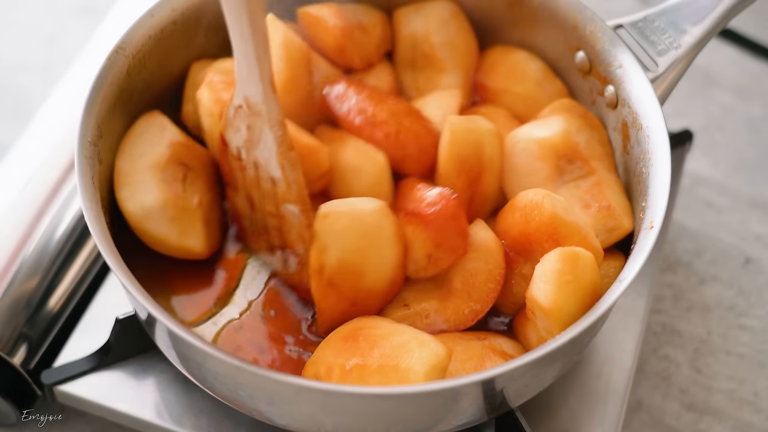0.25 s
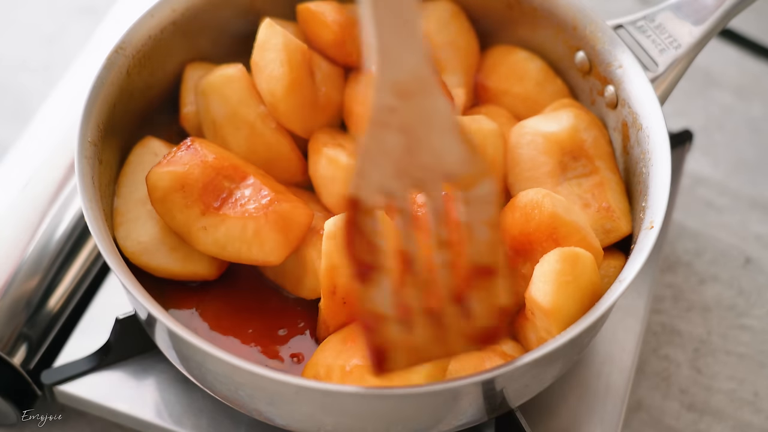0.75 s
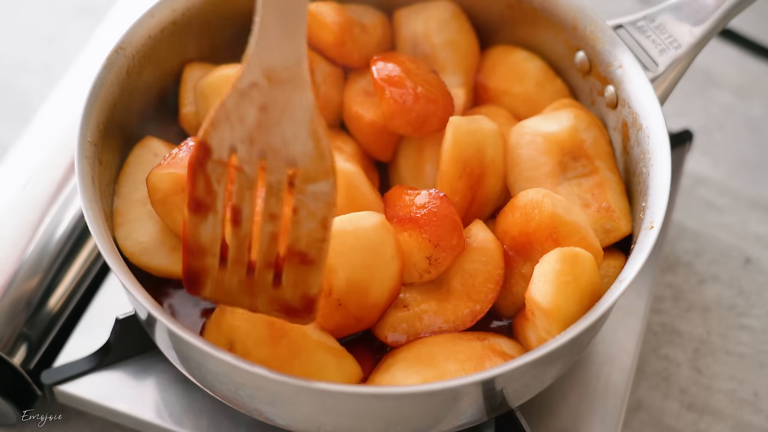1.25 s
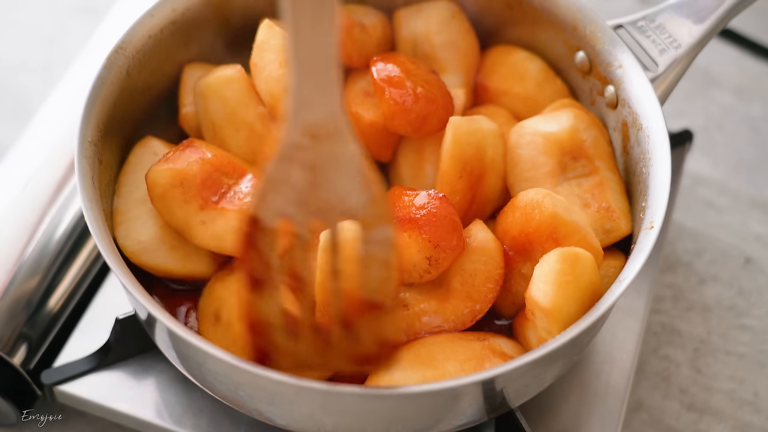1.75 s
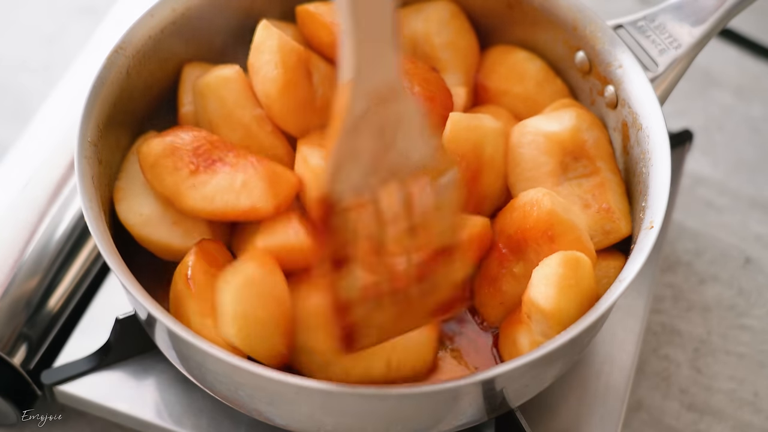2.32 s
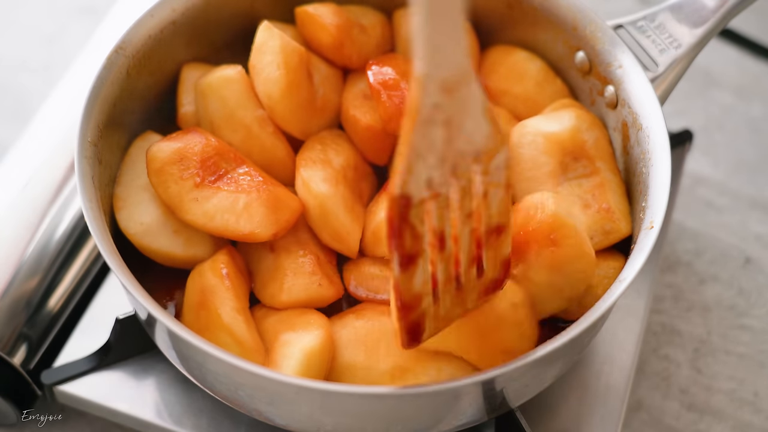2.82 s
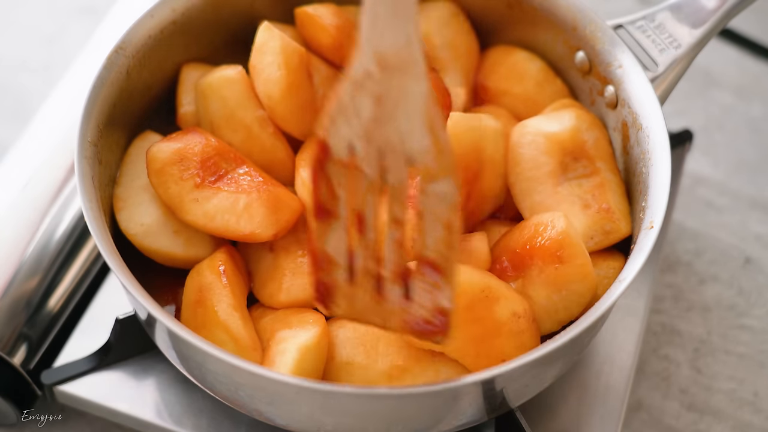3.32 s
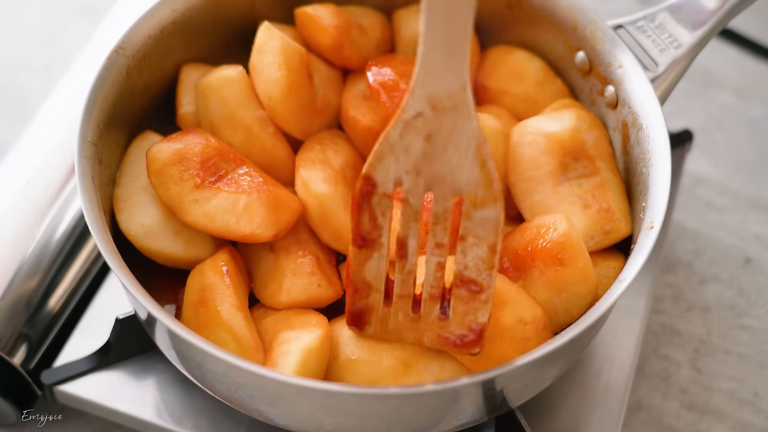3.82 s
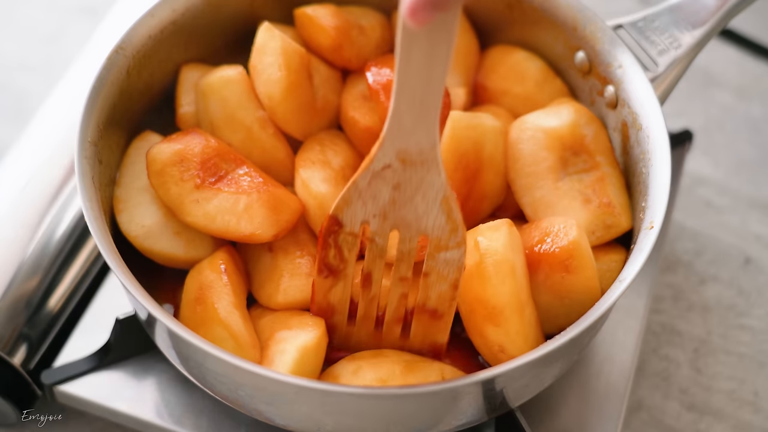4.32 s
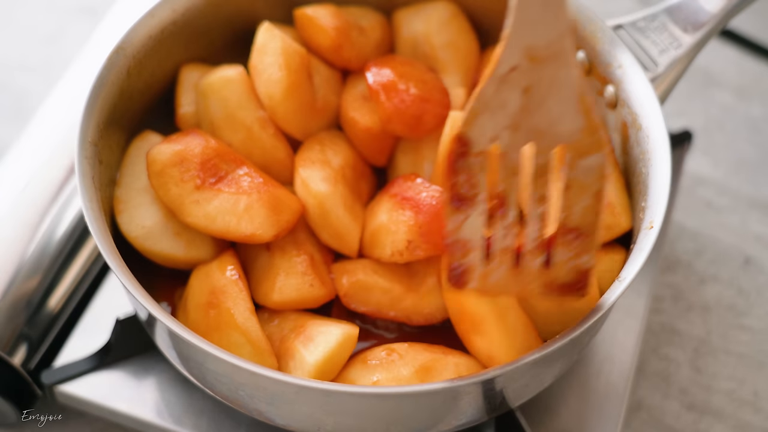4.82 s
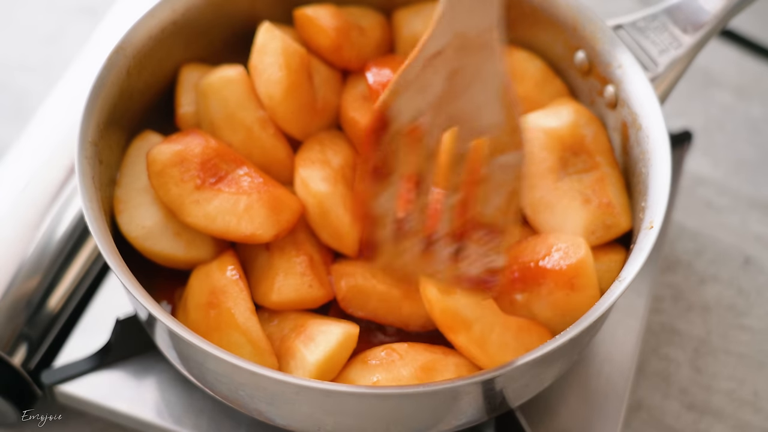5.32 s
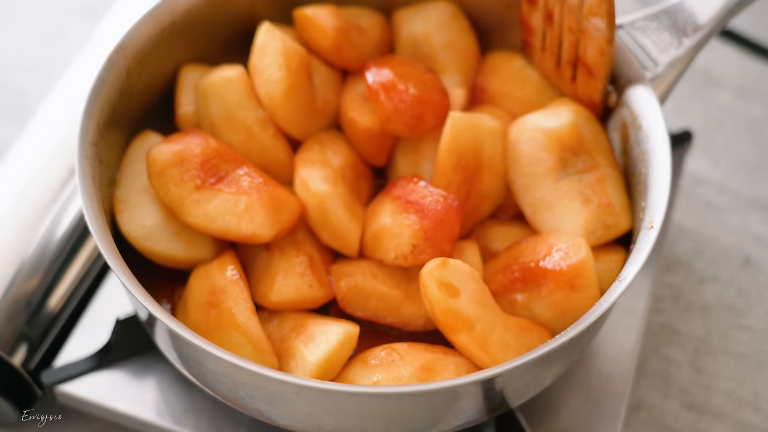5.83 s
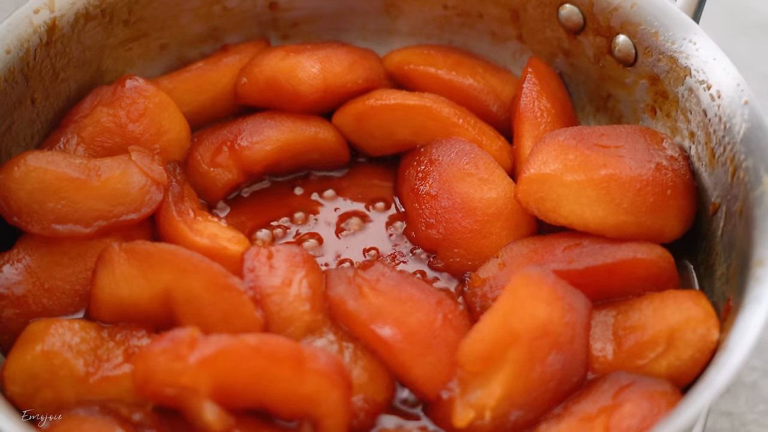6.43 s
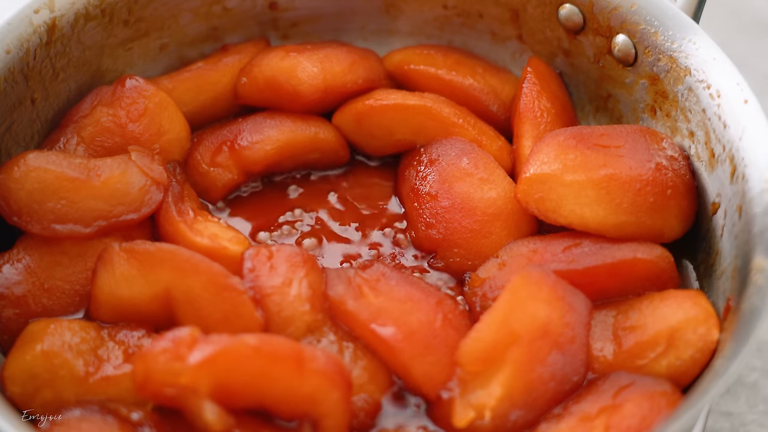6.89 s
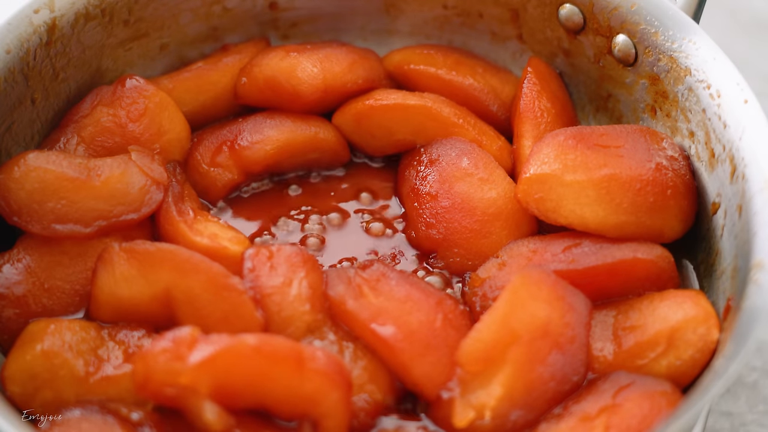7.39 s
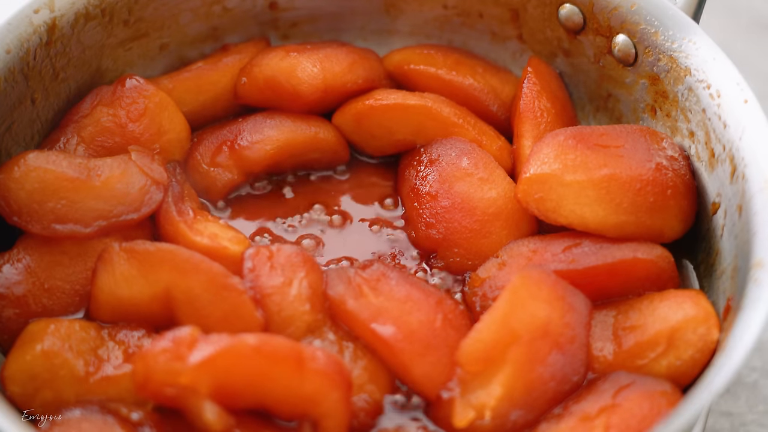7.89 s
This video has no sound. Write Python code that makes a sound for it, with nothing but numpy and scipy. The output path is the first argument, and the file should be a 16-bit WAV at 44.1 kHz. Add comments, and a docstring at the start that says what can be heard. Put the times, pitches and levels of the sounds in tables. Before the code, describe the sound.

A close stereo microphone catches a light, uneven sizzle with sharp little pops as a wooden spatula pushes fruit through syrup. Scrapes come in strokes, with woody clacks, muted pan rings and dull thuds; the sharpest knock comes just before six seconds. Then the sound switches instantly to a vigorous, bright boil, fuller and steadier, with deep syrup bubbles. The small room adds a short tail and faint low rumble.

```python
"""Small kitchen, close to a stove: apple pieces sizzle in caramel in a steel pan.
Clustered ringing bubbles and filtered click noise make the sizzle; fizz and steam flare with the syrup.
A wooden spatula rubs (coloured clicks), knocks (noise plus pan modes) and bumps (low decaying notes).
Near the end the sound jumps to a later stage: a hard boil, denser and brighter, with a few thick plops.
Wet squelches are gliding narrow-band noise; short scatter, a room tail and a low rumble surround it all."""
import sys
import numpy as np
from scipy import signal
from scipy.fft import rfft, irfft
from scipy.io import wavfile
from scipy.ndimage import uniform_filter1d

SR = 44100
rng = np.random.default_rng(int(sys.argv[2]) if len(sys.argv) > 2 else 0)


def master(y):
    """Save y as 16-bit WAV."""
    cut = np.clip(np.atleast_2d(y).T, -1, 1)
    pcm = np.round(cut * 32767)  # scale
    wavfile.write(sys.argv[1], SR, pcm.astype(np.int16))


N = 359415
TIME_S = np.arange(N) / SR
FREQ_HZ = np.fft.rfftfreq(N, 1 / SR)
TOP_HZ = 16000
FLARE_ATTACK_S, FLARE_RELEASE_S = 0.0098, 0.012


def undb(db):
    """Decibels to amplitude gain."""
    return 10 ** (np.asarray(db) / 20)


def unit(x):
    """Scale to rms 1."""
    return x / np.sqrt(np.mean(x ** 2))


def colour(x, points, resonances=()):
    """Shape by a spectrum (interpolated over log frequency) plus resonance peaks; rms 1."""
    hz, db = np.transpose(points)
    power = undb(np.interp(np.log(FREQ_HZ + 1), np.log(hz), db)) ** 2
    for centre_hz, width_hz, peak_db in resonances:
        detune = 2 * (FREQ_HZ - centre_hz) / width_hz
        power = power + undb(peak_db) ** 2 / (1 + detune ** 2) ** 2
    return unit(irfft(rfft(x) * np.sqrt(power), N))


def band(x, lo_hz, hi_hz, order=2):
    """Causal band-pass."""
    edges_hz = [lo_hz, min(hi_hz, SR / 2.1)]
    return signal.sosfilt(signal.butter(order, edges_hz, "band", fs=SR, output="sos"), x)


def fade(t, t60):
    """Exponential decay, 60 dB down after t60 (same unit as t)."""
    return np.exp(-np.log(1000) * t / t60)


def add(out, start_s, x):
    """Mix a sound in at start_s."""
    i = max(int(start_s * SR), 0)
    out[..., i:i + x.shape[-1]] += x[..., :N - i]


def drift(steps_per_s):
    """Smoothed random steps, rms near 1."""
    k = max(int(SR / steps_per_s), 1)
    steps = np.repeat(rng.standard_normal(N // k + 1), k)
    return unit(uniform_filter1d(steps, k))[:N]


def lean(x, left_db):
    """Stereo balance: left louder than right by left_db."""
    return x * undb(np.array([[left_db], [-left_db]]) / 2)


def swells(rows, attack_s, release_s):
    """Power envelope of events that rise linearly in amplitude, hold and decay exponentially."""
    power = np.zeros(N)
    for start_s, length_s, db in rows:
        rise = np.clip((TIME_S - start_s) / attack_s, 0, 1)
        fall = np.exp(-np.clip((TIME_S - start_s - length_s) / release_s, 0, 20))
        power += (undb(db) * rise * fall) ** 2
    return power


def patter(clicks_per_s, spread_db, side):
    """Random one-sample clicks of uneven size, spread between the ears."""
    sizes = undb(spread_db * rng.standard_normal(N).clip(-2, 2))
    clicks = (rng.random(N) < clicks_per_s / SR) * rng.standard_normal(N) * sizes
    return clicks * (1 + side * rng.standard_normal(N) * np.array([[1], [-1]]))


def bubbles(times_s, sizes, pitches_hz, cycles, width_db, lag_ms, glide, samples=160):
    """Each burst film rings for a few cycles, rising in pitch, with its own ear level and lag."""
    life, place, lag, sign = rng.standard_normal((len(times_s), 4)).T[:, :, None]
    first = (times_s * SR).astype(int).clip(0)
    where = (first[:, None] + np.arange(samples)).ravel()
    span = cycles * np.exp(0.62 * life)  # decay in cycles
    ears = []
    for side in (1, -1):
        lag_s = side * lag_ms * (.5 + lag) / 2 / 1e3
        turns = pitches_hz[:, None] * np.maximum(np.arange(samples) / SR + lag_s - 1e-4, 0)
        phase = 2 * np.pi * turns * (1 + glide * np.minimum(turns / span, 1))
        ring = np.sin(phase) * fade(turns, span) * (1 - np.exp(-2 * turns))
        peak = np.abs(ring).max(axis=1, keepdims=True) + 1e-9
        gain = sizes[:, None] * np.sign(sign) * undb(side * width_db * place / 2) / peak
        ears.append(np.bincount(where, (gain * ring).ravel(), N)[:N])
    return np.array(ears)


def crackle(clusters_per_s, centre_hz, octaves, spread_db, cycles, width_db, lag_ms):
    """Bubbles burst in threes within milliseconds, one setting off its neighbours."""
    starts_s = np.repeat(rng.random(int(clusters_per_s * N / SR)) * N / SR, 3)
    pitch, size, wait = rng.standard_normal((len(starts_s), 3)).T
    times_s = (starts_s + 0.003 * np.abs(wait)) % TIME_S[-1]
    hz = centre_hz * 2 ** (octaves * pitch)
    sizes = undb(spread_db * np.minimum(size, 2)) * (hz < TOP_HZ)
    x = bubbles(times_s, sizes, hz, cycles, width_db, lag_ms, glide=0.35)
    # steam escapes at an even pace, so big and small bursts balance over a moment
    power = uniform_filter1d(np.mean(x ** 2, axis=0), SR // 14)
    return x / np.sqrt(power + np.mean(x ** 2) / 20)


def wet_clicks(clicks_per_s, centre_hz, octaves, spread_db, cycles):
    """Air pockets open and shut in the syrup: longer, lower bubble rings; rms 1."""
    times_s = rng.random(int(clicks_per_s * N / SR)) * N / SR
    pitch, size = rng.standard_normal((len(times_s), 2)).clip(-2, 2).T
    hz = centre_hz * 2 ** (octaves * pitch)
    return unit(bubbles(times_s, undb(spread_db * size), hz, cycles,
                        width_db=-2, lag_ms=0.011, glide=0.29, samples=800))


def thud(db, hz, t60_s):
    """A low note blurred with noise: rises within about a cycle, then decays; peak at db."""
    t = np.arange(SR // 3) / SR
    blur = unit(band(rng.standard_normal(len(t)), hz * 0.55, hz * 1.87))
    x = (np.sin(2 * np.pi * hz * t) + .5 * blur) * fade(t, t60_s) * (1 - np.exp(-2 * hz * t))
    return x * undb(db) / np.abs(x).max()


def gentle_sizzle():
    """Sparse crackle over spurting fizz; both swell and steam hisses when syrup meets bare hot steel."""
    # syrup flaring up: (time [s], length [s], fizz level [dB], steam hiss level [dB])
    flares = [(0.026, 0.14, -47.5, -56), (.22, 0.24, -51, -54), (0.727, 0.017, -46, -47),
              (1.127, 0.09, -53, -55), (1.415, 0.31, -57, -61), (1.886, 0.35, -48, -54),
              (2.33, 0.25, -54, -69), (2.866, 0.043, -49, -62), (2.98, 0.05, -43.5, -58),
              (3.226, 0.058, -44.5, -67), (3.91, 0.11, -48, -62), (4.23, 0.11, -54.5, -63),
              (4.491, 0.19, -48, -60), (4.892, 0.035, -47.5, -54), (5.146, 0.065, -43.5, -64),
              (5.406, 0.042, -44, -60), (5.676, 0.012, -43, -54), (5.8, 0.11, -49.5, -59),
              (6.018, 0.032, -43.5, -47)]
    # fizz spectrum: (frequency [Hz], density [dB per Hz])
    fizz_colour = [(1200, 0.5), (2300, 6), (3200, 5), (4400, 4), (6500, 6), (8500, -2), (11000, -3),
                   (13000, -13), (16000, -28)]
    rest_crackle_db, rest_fizz_db = -45.5, -55.5
    flare = swells([(s, length, db) for s, length, db, _ in flares], FLARE_ATTACK_S, FLARE_RELEASE_S)
    steam = swells([(s, length, db) for s, length, _, db in flares], FLARE_ATTACK_S, FLARE_RELEASE_S)

    ticks = crackle(clusters_per_s=175, centre_hz=6000, octaves=.47, spread_db=6, cycles=7.2,
                    width_db=-1.5, lag_ms=0.018)
    ticks = ticks * unit(undb(2.24 * drift(25)))
    # a flare adds less power to the crackle than to the fizz
    ticks = ticks * np.sqrt(undb(rest_crackle_db) ** 2 + flare * undb(-3.75) ** 2)

    fizz = colour(patter(clicks_per_s=9000, spread_db=5, side=0.12), fizz_colour)
    fizz = band(fizz, 310, 10300, order=3)
    spurts = unit(undb(7.8 * np.tanh(drift(70)) + 2.7 * np.tanh(drift(16))))
    fizz = fizz * spurts * np.sqrt(undb(rest_fizz_db) ** 2 + flare)

    hiss = unit(band(patter(clicks_per_s=16000, spread_db=7, side=0.62), 6800, 13200))
    return lean(ticks + fizz + hiss * np.sqrt(steam), 1.6)


def stirring():
    """The spatula rubs the pan bottom in uneven slips and shoves the wet fruit along."""
    # shoves through the syrup: (time [s], length [s], level [dB])
    strokes = [(0.0, 0.43, -47), (.6, 0.65, -54.5), (2.22, 0.29, -49.5), (2.85, 0.13, -55.5),
               (3.85, .15, -58), (5.8, 0.17, -54.5)]
    # rub spectrum: (frequency [Hz], density [dB per Hz])
    rub_colour = [(110, -4.5), (160, 1), (380, -12), (480, -2), (580, 4.5), (760, -1), (1050, -0.5),
                  (1350, 3), (1900, 0), (2900, 0), (5000, -16)]
    rest_db = -55
    push = np.sqrt(undb(rest_db) ** 2 + swells(strokes, attack_s=0.055, release_s=0.31))
    rub = colour(patter(clicks_per_s=1400, spread_db=-1, side=0.037), rub_colour)
    rub = rub * undb(2.0 * drift(45))
    wet = wet_clicks(clicks_per_s=160, centre_hz=1333, octaves=0.572, spread_db=1.5, cycles=91)
    return lean((rub + wet * undb(-5.0)) * push, 0.74)


def kitchen():
    """Low rumble of stove and room as coloured noise, plus a deep band mostly on the left."""
    # rumble spectrum: (frequency [Hz], density [dB per Hz])
    rumble_colour = [(20, 5.5), (36, 14), (60, -3), (110, 8.5), (170, -24), (350, -41), (600, -11),
                     (1500, 3.5), (5000, -61)]
    rumble = colour(rng.standard_normal(N), rumble_colour)
    deep = unit(band(rng.standard_normal((2, N)), 42, 81, order=1))
    bed = lean(rumble, 4.7) * undb(-61.5) + lean(deep, 13.6) * undb(-66.5)
    return bed * undb(2 * drift(6.2))


def scatter(x, tail_s, wet_db):
    """Bursts bounce among fruit and steel wall: bright noise follows their smoothed energy."""
    keep = np.exp(-1 / (tail_s * SR))
    energy = signal.lfilter([1 - keep], [1, -keep], band(x, 5200, 15000) ** 2)
    smear = unit(band(rng.standard_normal((2, N)), 7100, 9600, order=1))
    return undb(wet_db) * np.sqrt(energy) * smear


def reflections(x, t60_s, wet_db):
    """A diffuse decaying tail, different at each ear."""
    t = np.arange(SR // 3) / SR
    tail = rng.standard_normal((2, len(t))) * fade(t, t60_s) * (t > .0006)
    tail /= np.sqrt(np.sum(tail ** 2, axis=1, keepdims=True))
    return undb(wet_db) * signal.fftconvolve(x, tail, axes=1)[:, :N]


def squelches():
    """Wet surfaces slip or syrup spits through a gap, ringing a resonance that glides with the gap."""
    # rubs, squeaks and spits: (time [s], length [s], rms level [dB], centre [Hz],
    # width [share of centre], pitch rise [share])
    wet_rubs = [(0.025, .03, -45, 1300, .07, .1), (0.056, .05, -46, 1380, .06, -.1),
                (0.072, 0.043, -51, 2730, .08, -0.07), (0.12, .04, -46, 2000, 0.43, 0),
                (0.34, 0.049, -47, 1050, 1, 0), (1.168, 0.039, -42.5, 1520, 0.95, -.05),
                (2.889, 0.042, -49, 1390, 1, 0), (2.982, .055, -47.5, 2950, .3, -0.053),
                (3.032, 0.03, -48.5, 1980, .15, 0), (3.227, .08, -50, 2700, .35, -.08),
                (3.525, 0.076, -50, 1860, .2, -.03), (4.859, 0.049, -49.5, 1560, 1, 0.0078),
                (5.809, .039, -44, 3850, .07, 0), (6.214, .0082, -30.5, 1740, 1, -0.012),
                (8.07, .12, -40.5, 1110, 0.65, -0.048), (8.083, 0.062, -39.5, 2310, 0.35, -0.0023)]
    out = np.zeros(N)
    for s, length_s, db, hz, width, rise in wet_rubs:
        slips = rng.standard_normal(SR // 4) * (rng.random(SR // 4) < .05)
        ring = band(slips, hz / (1 + width / 2), hz * (1 + width / 2))
        size = int(length_s * SR)
        # read the ring at a changing speed
        position = SR // 20 + np.cumsum(1 + rise * np.linspace(-.5, .5, size))
        gliding = np.interp(position, np.arange(len(ring)), ring)
        add(out, s, unit(gliding * signal.windows.tukey(size, .5)) * undb(db))
    return lean(out, 1.7)


def loud_pops():
    """Single bigger bubbles that spit, each just after a smaller, higher neighbour."""
    # loudest bursts: (time [s], relative level [dB], pitch [Hz])
    pops = [(0.0353, -26, 5700), (0.0508, -18, 5660), (0.4633, -22, 6720), (0.4913, -22, 5490),
            (0.7357, -19, 5210), (0.9438, -22, 5850), (0.9936, -25, 5160), (1.3698, -23, 6800),
            (1.7444, -20, 7210), (2.6, -22, 7970), (2.7921, -25, 5960), (2.8908, -23, 8300),
            (3.0674, -24, 8020), (3.1288, -22, 6260), (3.3568, -22, 7290), (3.4451, -26, 4900),
            (3.6451, -29, 6120), (3.8043, -25, 6890), (3.9943, -22, 6100), (4.2068, -27, 4720),
            (4.4348, -22, 6580), (4.4967, -21, 7540), (4.6184, -24, 4220), (4.9147, -20, 5970),
            (5.2565, -25, 7580), (5.2869, -22, 6960), (5.4919, -24, 6800), (5.5388, -23, 6580),
            (5.656, -25, 5180), (5.8825, -20, 6540), (6.0821, -27, 4090), (6.2023, -21, 5280),
            (6.3081, -15, 5340), (7.3063, -18, 6750)]
    s, db, hz = np.transpose(pops)
    lead = bubbles(s + 0.00037, undb(db - 8.5), hz * 1.25, cycles=3.4,
                   width_db=-9, lag_ms=0.012, glide=0.12)
    spit = bubbles(s + 0.00135, undb(db + 0.5), hz, cycles=8,
                   width_db=-2.5, lag_ms=0.0082, glide=0.03)
    return lean(lead + spit, 1.4)


def knocks():
    """Wood meets steel: a short woody clack and the pan's modal ring, damped by the fruit."""
    # spatula blows: (time [s], peak level [dB], upper cutoff [Hz], relative ring level [dB],
    # wood note [Hz], relative wood level [dB])
    blows = [(.639, -34, 2200, -6, 624, -4), (.878, -28.5, 3000, -4, 563, -0.5),
             (1.222, -24, 3400, -3, 784, 2), (1.938, -36.5, 1050, -1, 520, -8),
             (2.93, -27.5, 1990, -8, 548, -3.5), (5.7381, -19, 4150, 1.5, 480, -11),
             (5.878, -25, 2420, -12, 948, -8)]
    # pan modes: (frequency [Hz], relative level [dB], t60 [s])
    modes = [(269, -9, 0.44), (465, -14, 0.29), (604, 1, .12), (776, 0, 0.19), (962, -2, 0.28),
             (1140, -24, 0.074), (1300, -22, .1), (1715, 3, .09), (1833, 9.5, 0.06), (1980, 1.5, 0.32),
             (2980, 5, 0.25), (3150, 5, .12), (3330, 2, 0.068), (4090, 1, .16), (4000, -7, .12),
             (4511, -11, .1)]
    out, t = np.zeros(N), np.arange(SR // 2) / SR
    hz, mode_db, t60_s = np.transpose(modes)[:, :, None]
    for s, db, bright_hz, ring_db, wood_hz, wood_db in blows:
        mode_gain = undb(mode_db + 1.0 * rng.standard_normal(hz.shape))
        tones = np.sin(2 * np.pi * (hz * t + rng.random(hz.shape)))
        ring = np.sum(mode_gain * tones * fade(t, t60_s), axis=0)
        clack = rng.standard_normal(len(t)) * (fade(t, 0.011) + 0.17 * fade(t, 0.27))
        wood = np.sin(2 * np.pi * wood_hz * t) * fade(t, 0.094)
        blow = 4 * clack + undb(wood_db) * wood + undb(ring_db - 13.5) * ring
        blow = band(blow, 163, bright_hz, order=3)
        add(out, s, blow * undb(db) / np.abs(blow).max())
    return lean(out, 2.4)


def bumps():
    """Soft, heavy contacts of fruit and spatula with the pan, as low thuds."""
    # contacts: (time [s], peak level [dB], pitch [Hz], t60 [s])
    contacts = [(0.879, -35, 185, 0.058), (1.17, -51, 48.7, 0.14), (1.935, -44.5, 135, 0.04),
                (1.995, -46.5, 58.6, 0.048), (2.24, -44, 65, 0.038), (2.899, -40.5, 42.6, 0.14),
                (3.491, -51, 80, .12), (3.845, -39, 84, 0.051), (4.531, -48, 65, 0.047),
                (4.803, -39, 68.5, 0.05)]
    out = np.zeros(N)
    for s, db, hz, t60_s in contacts:
        add(out, s, thud(db, hz, t60_s))
    return lean(out, 13.0)


def hard_boil():
    """Dense, surging crackle and thicker blips over froth that sounds in the hollow of the pan."""
    # pan throwing the crackle at the microphone: (frequency [Hz], density [dB per Hz])
    throw = [(2000, -13), (3300, -4), (4800, -3), (6200, -1), (7400, -0.5), (8700, -6), (10500, 0),
             (13000, -4.5), (16000, -9)]
    # froth spectrum: (frequency [Hz], density [dB per Hz])
    froth_colour = [(88, -37), (150, -9), (291, -1), (466, -4.5), (612, 1), (730, 2.5), (1310, 1),
                    (1530, -5.5), (1870, 5.5), (3160, -2.5), (7040, -3.5), (8730, -14), (10400, -12),
                    (15100, -7), (16000, -41)]
    # resonances of the pan's hollow: (frequency [Hz], width [Hz], level [dB])
    hollow = [(233, 19, -3.5), (287, 9.1, 3), (593, 112, 6), (1890, 220, 3), (2420, 590, -3),
              (6840, 1300, -24)]
    # the boil wells up: (time [s], length [s], extra crackle level [dB])
    welling = [(7.02, 0.1, -41.5)]
    crackle_db, froth_db, blip_db = -38.5, -41, -58
    ticks = crackle(clusters_per_s=420, centre_hz=7440, octaves=.43, spread_db=5.5, cycles=11.0,
                    width_db=1.5, lag_ms=0.012)
    ticks = colour(ticks, throw) * undb(1.5 * drift(9))  # the boil heaves
    froth = colour(patter(clicks_per_s=7000, spread_db=3.5, side=0.087), froth_colour, hollow)
    froth = froth * undb(1.04 * drift(35))
    blips = wet_clicks(clicks_per_s=38, centre_hz=1285, octaves=0.666, spread_db=8.5, cycles=59)
    vigour = np.sqrt(undb(crackle_db) ** 2 + swells(welling, FLARE_ATTACK_S, FLARE_RELEASE_S))
    return lean(ticks * vigour, 4.0) + lean(froth * undb(froth_db) + blips * undb(blip_db), 4.1)


def plops():
    """Big bubbles open in the thick syrup, as low thuds."""
    # bubbles: (time [s], peak level [dB], pitch [Hz])
    thick_bubbles = [(6.475, -28.5, 300), (6.485, -29.5, 497), (6.568, -34, 630), (6.98, -33, 552),
                     (8.016, -29.5, 235), (8.017, -28, 570), (8.084, -36, 255)]
    out = np.zeros(N)
    for s, db, hz in thick_bubbles:
        add(out, s, thud(db, hz, t60_s=0.079))
    return lean(out, 3.5)


def scene():
    """The pan in its two stages, with echoes from its own wall and from the kitchen."""
    boil_start_s, switch_s = 6.195, 0.0051
    boiling = np.clip((TIME_S - boil_start_s) / switch_s, 0, 1)
    sizzle = (gentle_sizzle() + stirring()) * (1 - boiling) + hard_boil() * boiling + loud_pops()
    direct = sizzle + scatter(sizzle, tail_s=0.00048, wet_db=-16.0)
    direct = direct + squelches() + knocks() + bumps() + plops()
    return direct + reflections(direct, t60_s=0.23, wet_db=-14.5) + kitchen()


def record(dry):
    """The recorder cuts the top: a steep elliptic low-pass."""
    return signal.sosfilt(signal.ellip(10, .2, 80, TOP_HZ, fs=SR, output="sos"), dry)


dry = scene()
out = record(dry)
master(out)
```